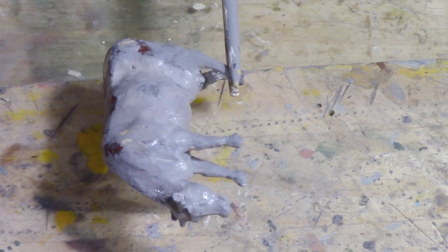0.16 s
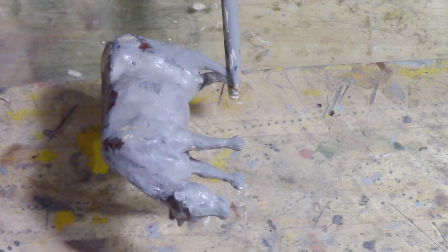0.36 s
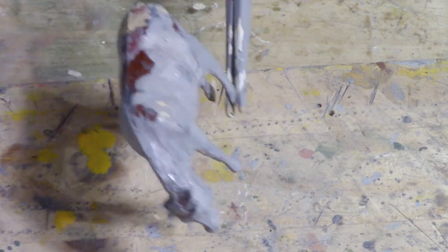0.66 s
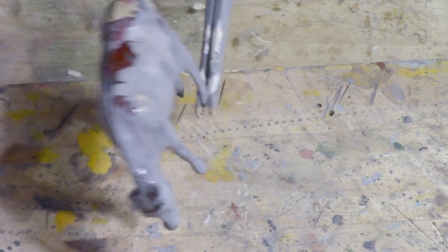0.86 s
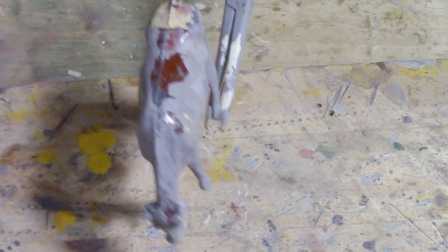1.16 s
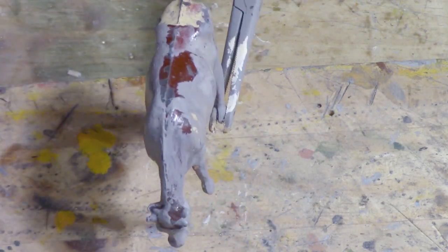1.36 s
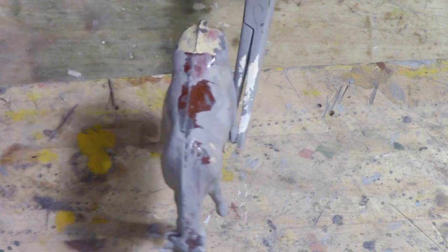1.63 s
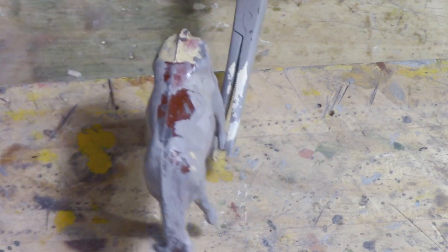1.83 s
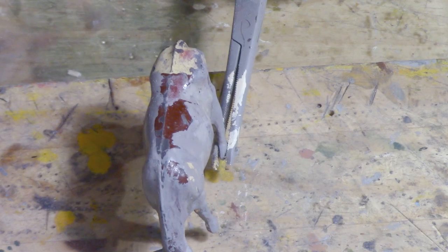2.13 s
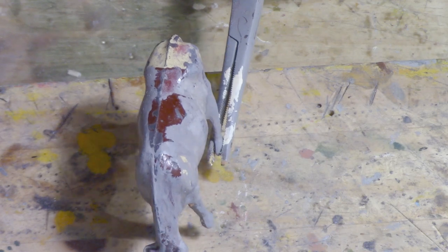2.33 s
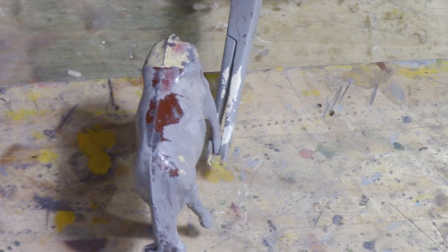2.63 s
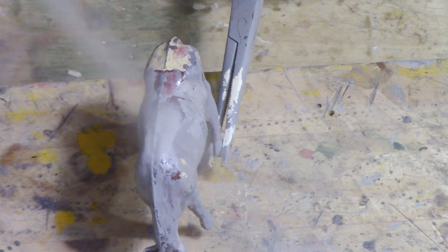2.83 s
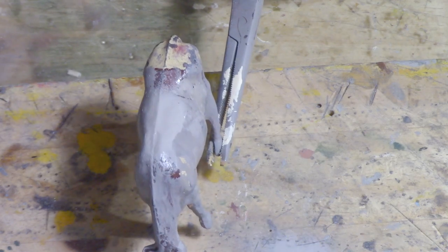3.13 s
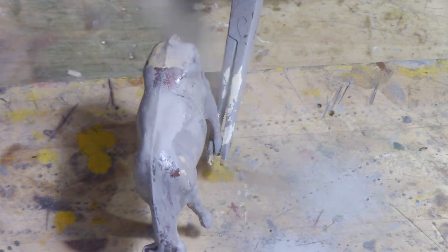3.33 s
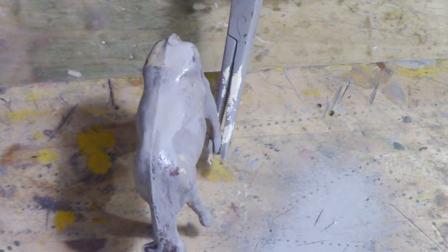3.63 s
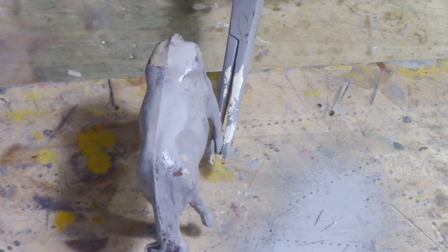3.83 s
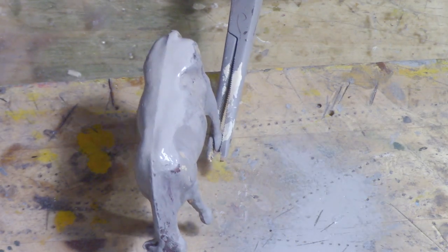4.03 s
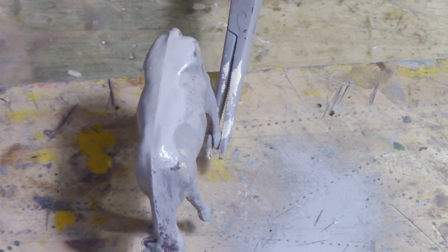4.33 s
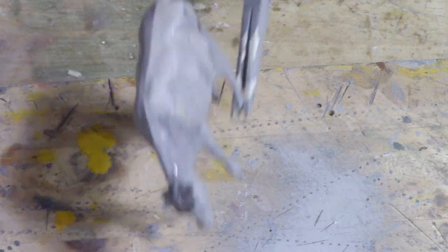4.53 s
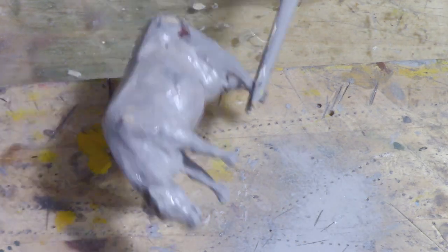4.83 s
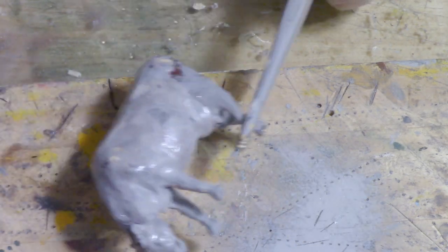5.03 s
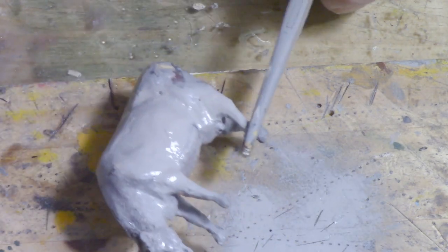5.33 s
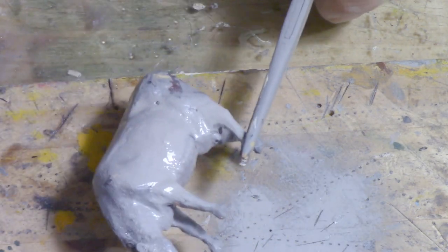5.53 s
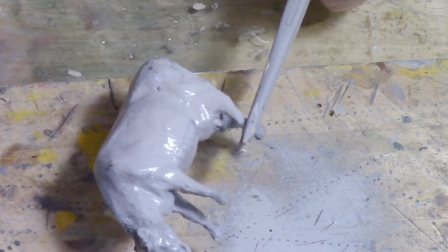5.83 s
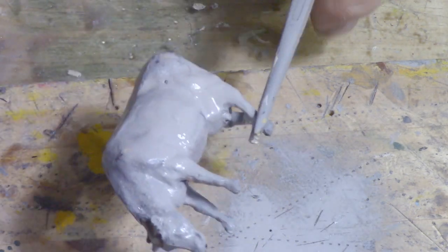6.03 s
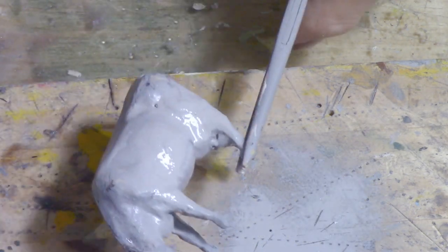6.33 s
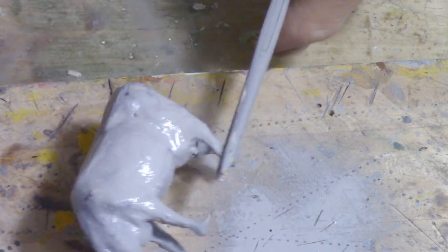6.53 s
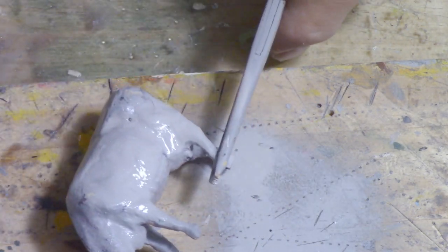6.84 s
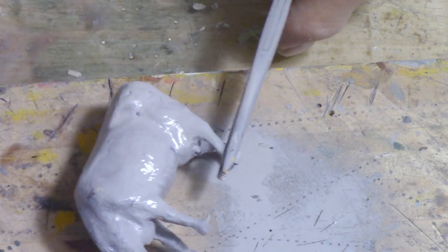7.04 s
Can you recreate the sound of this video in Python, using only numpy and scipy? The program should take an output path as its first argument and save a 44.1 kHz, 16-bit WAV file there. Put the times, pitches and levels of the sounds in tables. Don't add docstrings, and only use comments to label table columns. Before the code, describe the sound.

Hard, bright, dense clacking of mixing balls inside a thin metal can, in quick strokes, thins out into weaker ticks and a tiny low gurgle. After a brief quiet, short gas hisses with a wet, rough edge puff seven times, three and then four after a longer gap, with small metallic knocks as the can tilts. Close microphone, short room tail, low steady hiss.

```python
import sys
import numpy as np
from scipy import signal
from scipy.fft import rfft, irfft
from scipy.io import wavfile
from scipy.ndimage import uniform_filter1d, minimum_filter1d

SR = 44100
rng = np.random.default_rng(int(sys.argv[2]) if len(sys.argv) > 2 else 0)


def output_pcm(signal):
    pcm = np.clip(np.atleast_2d(signal).T, -1, 1) * 32767
    wavfile.write(sys.argv[1], SR, np.round(pcm).astype(np.int16))


def ratio(d):
    e = np.asarray(d, float) / 20
    return 10 ** e


N = 316682

# (frequency [Hz], density [dB per Hz])
FLOOR = [(25, -25), (110, -12.5), (190, -7), (340, -3), (500, -4.5), (900, -7.5), (1230, -8), (1500, -9),
         (2700, -15.5), (6000, -22), (11000, -30), (15700, -44)]
# (time [s], level [dB])
RUSTLE = [(4.45, -92), (4.62, -73.5), (4.7, -77.5), (4.72, -69), (4.751, -74.5), (4.775, -63.5),
          (4.82, -84.5)]
# (frequency [Hz], t60 [s])
ROOM_DECAY = [(250, 0.11), (700, 0.73), (1800, 0.41), (4600, 0.39), (9000, 0.29), (15000, 0.21)]
# (delay [ms], level [dB])
EARLY = [(1.0, -24), (2.3, -18), (9.5, -14), (13.0, -16.5)]
# (time [s], pitch [Hz], level [dB])
GURGLE = [(2.054, 345, -66), (2.068, 325, -48), (2.088, 279.3, -66), (2.108, 265, -51), (2.135, 255, -59),
          (2.15, 320, -59), (2.165, 325, -58), (2.2, 268, -58), (2.245, 245.6, -63)]

# (start [s], leak length [s], leak level [dB], open length [s], open level [dB])
PUFFS = [(2.782, 0.0533, -41, 0.095, -28), (3.302, 0.031, -42.5, 0.15, -29),
         (3.885, 0.028, -37, 0.12, -27.5), (5.154, 0.041, -44, 0.14, -30.5),
         (5.677, 0.0573, -43, 0.0588, -30.5), (6.489, 0.054, -45, 0.149, -31),
         (6.927, 0.048, -41, 0.081, -31.5)]
# (first delay [ms], level [dB], second delay [ms], level [dB], slide of the delays over the
BOUNCES = [(.65, -12, .542, -13, -.05), (.266, -10, .212, -9, -.04), (.206, -12, .548, -13, .1),
           (.398, -12, .518, -14, -.06), (.272, -12, 1.106, -14, .02), (.32, -11, .668, -13, -.02),
           (.452, -12, .668, -10, .02)]
# (wall ring [share], treble [dB], nozzle [Hz], mid swell [dB], lean over puff [dB])
GRIP = [(2.2, -6.5, 8700, 4, -1.5), (1.9, -4.5, 10000, 1.5, -2.5), (1.4, -6, 7300, 1.5, -2),
        (0.65, -5, 7500, 2.5, -0.5), (0.46, -4.5, 7500, 2, 2), (0.87, -4.5, 9200, 4, 1.5),
        (0.39, -9, 10300, 5, -1.5)]
# (frequency [Hz], density [dB per Hz])
JET = [(880, -66), (1500, -1.5), (1900, -15.5), (2640, -9), (2940, -7.5), (4420, 3.5), (4920, 3), (8570, 5),
       (14800, -1.5), (16000, -11)]
# (frequency [Hz], density [dB per Hz])
PAINT = [(59, -53), (100, -11), (414, 2), (513, -1.5), (618, -2.5), (1130, 0.5), (1610, 5), (2190, 2),
         (2370, 3.5), (3270, -4), (4000, -1.5), (5200, -67), (8800, -120)]
PAINT_DB = [
    -1.5,
    -18.5,
    -7.5,
    -5,
    -9,
    -3.5,
    4,
    0,
]

# (frequency [Hz], density [dB per Hz])
STEEL = [(1650, -48.5), (2800, -3), (3480, -0.5), (3800, -1), (4870, -2.5), (5720, 0), (8670, -9),
         (9890, -14), (15000, -32.5), (16000, -38)]
# (frequency [Hz], level [dB], t60 [s])
SHELL = [(3217, -3, 0.0077), (5640, 1, 0.021), (8760, -0.5, 0.0063), (10200, -10, 0.0071)]
# (frequency [Hz], density [dB per Hz])
CONTACT = [(6000, -30), (9000, -4.5), (10600, -1), (12500, -9), (16000, -30)]
# (frequency [Hz], t60 [s])
BRIGHT_DECAY = [(1250, .025), (1600, .008), (2700, .008), (3150, .007), (3480, .018), (3800, .006),
                (5700, .006), (9000, .005)]
# (low edge, high edge [Hz])
SNAP_HZ = [1100, 6500]
# (frequency [Hz], level [dB], t60 [s])
WALL = [(2318, -1, .04), (2375, -6, .022), (2420, 2, .042), (2455, -2, .03), (2532, -2, .034),
        (2206, -8, .025), (2260, -9, .018), (2590, -8, .02), (2633, -7, .028), (2090, -13, .018),
        (2790, -11, .018)]
# (frequency [Hz], level [dB], t60 [s])
BARREL = [(542.5, -12.5, 0.059), (1256, -7, 0.027), (1415, -7, .04), (1558, -5, .03), (1703, 3, 0.044),
          (2070, -4, 0.034), (2840, -1, .03), (3111, -6.5, 0.027), (3240, -2.5, .03), (3220, -1, 0.043),
          (3640, -2, 0.034), (3500, -4, 0.035)]
# (frequency [Hz], density [dB per Hz])
DOME = [(150, -35), (300, -18), (430, -15), (505, -14), (600, -10), (741, -6.5), (1230, 6.5), (1950, 2.5),
        (2730, -31.5), (4620, -120)]
# (time [s], pitch [share])
TILT = [(1.4, 1.0), (1.55, 0.95), (1.96, 0.93), (2.1, 0.92), (4.2, 0.99), (4.3, 0.97), (5.5, 0.97),
        (5.9, 0.93), (6.9, 0.86)]

# (start [s], length [s], loudest at [share 0-1], level [dB], dome over chatter [dB])
STROKES = [(0.031, 0.094, 0.13, -26.5, 6), (0.142, 0.22, 0.49, -18.5, -2), (0.363, 0.19, 0.7, -19, -3),
           (0.554, 0.18, 0.35, -17.5, -1.5), (0.727, 0.14, 0.86, -20.5, -4.5),
           (0.881, 0.16, 0.22, -31, 7.5), (1.078, .325, 0.45, -53, 13), (1.498, 0.66, 0.35, -57.5, 1),
           (0.0, 0.051, 0.3, -39, 0.5)]
CHATTER_THUD_DB = [-7.5, 9]
# (time [s], crack [dB], relative wall ring [dB], bright ring [Hz], relative contact [dB])
SHAKING = [(0.026, -23, 1, 4103, -4), (0.0327, -0.5, -16, 5280, 9.5), (0.0381, -9, -7.5, 7600, 6),
           (0.046, -2, -3, 2860, 2), (0.0517, -7.5, -6, 3030, 13), (0.06, -14, -5.5, 3460, -5),
           (0.072, -11.5, -9, 7050, -2), (0.0741, -3.5, -13, 4490, 10), (0.1289, -15, -12.5, 1430, -6.5),
           (0.1436, 1.5, -18, 4760, 9), (0.1512, -6.5, 0.5, 2580, -6.5), (0.157, -5.5, -12.5, 3270, 2.5),
           (0.1709, -3.5, -13, 2970, 6), (0.197, -6, -8, 3360, -1), (0.2351, -2.5, -9.5, 7260, 2),
           (0.241, -1.5, -8, 2745, -0.5), (0.2479, -6, -0.5, 3400, -3.5), (0.205, -8.5, -8, 3287, 1),
           (0.297, -14.5, -8, 3360, -0.5), (0.3644, -0.5, -12.5, 4300, 1), (0.3702, 0.5, -20.5, 7400, 7),
           (0.374, 3, -19.5, 4450, -1), (0.403, -1.5, -16.5, 5530, 3.5), (0.42, 1.5, -11, 3000, 1),
           (0.4389, -1, -5.5, 5400, 4.5), (0.4514, -4.5, -7, 5600, -0.5), (0.4565, -4, -4, 5150, 7),
           (0.4703, -6.5, -3, 7900, -2.5), (0.487, -12, -6, 5260, 6.5)]
# (time [s], crack [dB], relative wall ring [dB], bright ring [Hz], relative contact [dB])
SHAKING_ON = [(0.5534, 3.5, -21, 5850, 8.5), (0.558, 0, -20, 3390, 0), (0.566, -6, -20.5, 3540, 2),
              (0.5754, -7.5, -18.5, 6800, 2.5), (0.5893, -3.5, -19, 3520, 2.5), (0.601, -7, -17.5, 3480, 0),
              (0.612, -7.5, -16, 3450, -0.5), (0.637, -1.5, -11.5, 5600, -0.5),
              (0.6444, -3.5, -8, 5850, 0.5), (0.6567, -7.5, -9.5, 5400, 4.5), (0.6648, -7, 0.5, 2850, 3),
              (0.6771, -2.5, -5, 3510, -2.5), (0.727, 6.5, -25, 5780, -1.5), (0.7463, -12, 12.5, 2550, -2),
              (0.7653, -12.5, -19, 7700, 4.5), (0.7679, -4.5, -25, 3000, -1), (0.7969, 4, -27, 5580, 7),
              (0.8051, -0.5, -11.5, 5400, 0), (0.812, -6.5, -11, 3520, -2), (0.826, -16, -16.5, 6950, -1.5),
              (0.8326, -7, -21, 3440, -2), (0.8365, -10.5, -11.5, 1240, -1), (0.848, -11, -14, 1220, 1.5),
              (0.8774, -3, 2.5, 2840, -5), (0.883, -1.5, -16.5, 5070, -9), (0.9136, -1.5, -6, 5470, -11)]
# (time [s], crack [dB], relative wall ring [dB], bright ring [Hz])
SLOWING = [(0.9704, -10, -5, 3100), (1.0105, -14, -7, 3700), (1.038, -20.5, -10, 3770),
           (1.071, -9, -19, 6870), (1.0903, -9, -6.5, 5750), (1.118, -32, -3, 5100),
           (1.134, -8.5, -2, 2900), (1.153, -18, -12, 4300), (1.16, -19, -24, 2980),
           (1.163, -20, -17, 8400), (1.1766, -10.5, -15, 5600), (1.1827, -19, -5.5, 3630),
           (1.2274, -26.5, -3, 4300), (1.242, -22.5, -10, 5970), (1.257, -25, -3, 3630),
           (1.27, -18, -10, 6300), (1.2765, -19, -5.5, 6300), (1.285, -23.5, -4.5, 2970),
           (1.2937, -31, -11, 6200), (1.3015, -20.5, -12, 6050), (1.312, -26, -9, 4070),
           (1.332, -26, -1, 3440), (1.3372, -20.5, -14, 6200), (1.353, -28, -20, 3040)]
# (time [s], crack [dB], relative wall ring [dB], bright ring [Hz])
ROLLING = [(1.5457, -48, 0, 3300), (1.5682, -43.5, 2, 3330), (1.5716, -36, -9, 3100),
           (1.5805, -35, -3.5, 3370), (1.637, -45, -11, 3040), (1.6604, -30, -31, 5800),
           (1.6676, -34.5, -9, 3700), (1.696, -43, -3, 3900), (1.724, -34.5, -3.5, 2850),
           (1.7475, -42, 0, 3000), (1.7576, -29.5, -15, 6030), (1.7618, -36, -8, 3260),
           (1.7881, -31, -15, 3220), (1.9708, -22, -5, 3820), (1.982, -41, 11.5, 3050),
           (1.9957, -41, 4, 3020), (2.0103, -42, 4, 2820), (2.0276, -35.5, -12, 4040),
           (2.0761, -42, 1, 5500), (2.088, -48, 0, 2920), (2.445, -53.5, -2.5, 3300)]
# (time [s], crack [dB], relative wall ring [dB], bright ring [Hz], its level [dB])
STRAYS = [(3.8132, -49, -12.5, 3900, 2.5), (3.8348, -48, -16.5, 4310, 0), (3.895, -40, -17.5, 5700, 16),
          (4.2203, -25.5, -6, 3600, -4.5), (4.26, -36, -9, 3640, 3), (4.2635, -30, -17, 4190, -14),
          (4.3155, -37.5, -5.5, 3760, 0), (4.3226, -46, -12, 3850, 6.0), (4.49, -51.5, -7, 1900, 0),
          (5.1636, -32, -24, 7140, 8), (5.2097, -24, -21, 7750, 4), (5.5357, -29, -10, 3935, -2.5),
          (5.598, -36, -26, 3750, -3.5), (5.742, -21.5, -30, 7000, 2), (5.901, -31, -10, 3830, -7),
          (5.9136, -42, -8, 2940, 7), (5.9442, -41.5, -22, 4030, 14), (5.9947, -51, -9, 4040, 2),
          (6.18, -53, -3.5, 1903, -0.5), (6.5, -42, -14, 4000, 6), (6.516, -42, -9, 2700, 3),
          (6.878, -46, -11, 2900, 3), (6.9016, -21, -20, 4070, 4.5), (6.9067, -35.5, -14, 4440, 12),
          (6.9281, -30.5, -8, 9000, -3), (6.9474, -34, -30, 6350, 7), (6.9535, -29, -24, 6700, 7),
          (6.968, -30, -26, 9000, 11)]
STEEL_DB = [
    0.5,
    -0.5,
    -0.5,
    -2.5,
    -2,
]
THUD_DB = [
    -2.5,
    -3.5,
    -1,
    0.5,
    -5,
]
# (time [s], level [dB])
LURCH = [(0.05, -60), (0.15, -50.5), (0.244, -55.5), (0.367, -36), (0.453, -42.5), (0.556, -46),
         (0.73, -36.5), (0.806, -50), (0.88, -53.5)]


def evened(x):
    return x / np.sqrt(np.mean(x ** 2) + 1e-20)


def read(points, hz):
    f, value = np.transpose(points)
    return np.interp(np.log(hz + 1), np.log(f + 1), value)


def add(mix, s, sound):
    part = mix[round(s * SR):][:len(sound)]
    part += sound[:len(part)]


def noise(spectrum, count):
    hz = np.fft.rfftfreq(count, 1 / SR)
    bins = rfft(rng.standard_normal(count))
    return evened(irfft(bins * ratio(read(spectrum, hz)), count))


def drift(count, span):
    return evened(uniform_filter1d(uniform_filter1d(rng.standard_normal(count), span), span))


def floor():
    s, db = np.transpose(RUSTLE)
    cloth_db = np.interp(np.arange(N) / SR, s, db, -120, -120) + 3.0 * drift(N, 60)
    cloth = ratio(cloth_db) * noise(JET[:-2] + [(13000, -14.5), (16000, -35.0)], N)
    hiss = ratio(-57.5 + 0.5 * drift(N, 1500)) * noise(FLOOR, N)
    return hiss + cloth


def room(x):
    tails, turn_s = 3, 0.05
    out = np.zeros(N)
    turn = np.pi * np.arange(N) / SR / turn_s / tails
    for k in range(tails):
        hz, t, z = signal.stft(rng.standard_normal(SR), SR, nperseg=256)
        decay = ratio(-60 * t / read(ROOM_DECAY, hz)[:, None])
        tail = signal.istft(z * decay, SR, nperseg=256)[1]
        tail *= np.clip((np.arange(len(tail)) / SR - 0.004) / 0.004, 0, 1)
        feed = np.sqrt(2 / tails) * np.sin(turn + np.pi * k / tails)
        out += signal.fftconvolve(x * feed, tail / np.linalg.norm(tail))[:N]
    return out


def early(x):
    taps = np.zeros(1024)
    taps[0] = 1
    for ms, db in EARLY:
        taps[round(ms * SR / 1000)] = ratio(db)
    return signal.oaconvolve(x, taps / np.linalg.norm(taps))[:N]


def gurgle():
    s, hz, db = np.transpose(GURGLE)
    t = np.arange(s[0], s[-1], 1 / SR)
    throb = 1 + 0.3 * np.sin(2 * np.pi * 26 * (t - s[0]))
    tone = np.sin(2 * np.pi * np.cumsum(np.interp(t, s, hz)) / SR) * throb
    return s[0], np.sqrt(2) * ratio(np.interp(t, s, db)) * tone * signal.windows.tukey(len(t), 0.15)


def resonate(x, hz, width):
    turn = np.exp(2j * np.pi * np.cumsum(hz * np.ones(len(x))) / SR)
    r = np.exp(-np.pi * width / SR)
    return 2 * (turn * signal.lfilter([1 - r], [1, -r], x / turn + 1e-18)).real


def valve(start, leak_s, leak_db, open_s, open_db, swell_db, lean_db):
    spit_s, opening_s, closing_s, dribble_s = 0.019, 0.022, 0.013, 0.015
    half_s = (open_s - opening_s) / 2
    s = start + np.cumsum([0, spit_s, leak_s - spit_s, opening_s, half_s, half_s, closing_s, dribble_s])
    ends_db = open_db - swell_db / 2
    levels_db = [-54, leak_db + 1, leak_db,
                 ends_db - lean_db / 2, open_db + swell_db / 2, ends_db + lean_db / 2,
                 open_db - 23.5, open_db - 49]
    return s, levels_db


def bounce(sound, paths, treble_db):
    near_ms, near_db, far_ms, far_db, sweep = paths
    hz, t, z = signal.stft(sound, SR, nperseg=512)
    delay_ms = np.r_[near_ms, far_ms, rng.uniform(0.9, 2.6, 4)]
    slide = 1 + sweep * (2 * t / t[-1] - 1)
    turns = delay_ms[:, None, None] * hz[:, None] * slide / 1000
    echo = np.tensordot(ratio([near_db, far_db] + 4 * [-17]), np.exp(-2j * np.pi * turns), 1)
    comb = 1 + echo * np.clip(hz / 7000, 0, 1)[:, None]
    patches = evened(uniform_filter1d(uniform_filter1d(rng.standard_normal(z.shape), 6, 0), 5, 1))
    aim_db = treble_db * np.clip((hz - 9500) / 4000, 0, 1)[:, None] + 2.0 * patches
    return signal.istft(z * comb * ratio(aim_db), SR, nperseg=512)[1]


def puff(press, paths, grip):
    ring_share, treble_db, nozzle_hz, swell_db, lean_db = grip
    s, levels_db = valve(*press, swell_db, lean_db)
    t = np.arange(s[0], s[-1], 1 / SR)
    jet_db = np.interp(t, s, levels_db)
    paint_db = np.interp(t, s, PAINT_DB)
    rising_hz = nozzle_hz * (1 + 0.1 * ((t - s[0]) / (s[-1] - s[0]) - 0.5))
    jet = noise(JET, len(t))
    jet = evened(jet + 0.07 * resonate(jet, rising_hz, 900))
    roar = noise(PAINT, len(t))
    roar = evened(roar + ring_share * resonate(roar, 2310, 80) + 0.12 * resonate(roar, 1555, 90))
    sputter = ratio(1.06 * drift(len(t), 25) + 0.17 * drift(len(t), 250))
    sound = sputter * ratio(jet_db - 2.5) * (jet + ratio(np.minimum(paint_db, 6)) * roar)
    return s[0], bounce(sound * signal.windows.tukey(len(t), 0.04), paths, treble_db)


def ring(modes, spread_db=5, detune=0.01, tune=1):
    t = np.arange(2048)[:, None] / SR
    hz, db, t60 = np.transpose(modes)
    share, off, phase = rng.standard_normal((3, len(hz)))
    level = ratio(db + spread_db * share - 60 * t / t60)
    wave = (level * np.sin(2 * np.pi * hz * (tune + detune * off) * t + phase)).sum(1)
    fade_in = np.minimum(t[:, 0] / 0.0002, 1)
    fade_out = np.minimum(t[::-1, 0] / 0.01, 1)
    return wave / abs(wave).max() * fade_in * fade_out


def thud():
    t = np.arange(2048) / SR
    return noise(DOME, 2048) * ratio(-60 * t / 0.028) * np.minimum(t / 0.00046, 1)


def crack(steel_db, tick_db, bright_hz, bright_db):
    t = np.arange(2048) / SR
    steel = noise(STEEL, 2048) * ratio(-60 * t / 0.013) + 0.21 * ring(SHELL, detune=0.25)
    bright_level = 1.28 * ratio(bright_db - 60 * t / read(BRIGHT_DECAY, bright_hz))
    bright = bright_level * np.sin(2 * np.pi * bright_hz * t)
    tick = ratio(tick_db - 60 * t / 0.0078) * noise(CONTACT, 2048)
    snap_band = signal.butter(2, SNAP_HZ, "band", fs=SR, output="sos")
    snap = signal.sosfilt(snap_band, t == t[4])
    steel = steel + ratio(-10.0) * snap / abs(snap).max()
    onset = (1 - np.exp(-t / 0.00008)) ** 2
    return onset * (ratio(steel_db) * steel + bright + tick)


def rattle():
    out = np.zeros(N)
    gather_db, scatter_db = -4.5, -16
    for start, length, top, db, dome_db in STROKES:
        t = np.arange(0, length, 1 / SR) / length
        top = np.clip(top, 0.01, 0.99)
        level_db = db + np.interp(t, [0, top, 1], [gather_db * np.sqrt(top), 0, scatter_db])
        thud_db = np.interp(t, [0, 1], CHATTER_THUD_DB) + dome_db
        hit = rng.random(len(t)) < 1200 / SR
        size = ratio(4.2 * np.minimum(rng.exponential(1, len(t)), 3)) * hit
        spot = rng.integers(0, 16, len(t))
        tune = np.interp(start + length / 2, *np.transpose(TILT))
        parts = np.zeros((4, len(t)))
        for k in range(16):
            shapes = [crack(0, -17.5, rng.uniform(2100, 7100), -0.91),
                      ring(WALL, 3.0, 0.0028, tune),
                      ring(BARREL, 7, detune=0.0071),
                      thud()]
            hits = (size * (spot == k))[None]
            parts += signal.oaconvolve(hits, np.array(shapes), axes=1)[:, :len(t)]
        steel, wall, side, dome = (evened(p) for p in parts)
        chatter = steel + ratio(-3) * wall + ratio(-4) * side + ratio(thud_db - 0.5) * dome
        add(out, start, signal.windows.tukey(len(t), 0.015) * ratio(level_db - 1.5) * chatter)
    return out


def strikes():
    out = np.zeros(N)
    tables = (SHAKING, SHAKING_ON, SLOWING, ROLLING, STRAYS)
    for table, steel_db, thud_db in zip(tables, STEEL_DB, THUD_DB):
        for s, db, ring_db, hz, *more in table:
            more_db = sum(more)
            contact_db, bright_db = (0, more_db) if table is STRAYS else (more_db, 0)
            tune = np.interp(s, *np.transpose(TILT))
            tick_db = -16.0 + 0.2 * max(db, -30) + contact_db
            wall_db = ring_db + 3
            blunt_db = 0.51 * wall_db
            body = (ratio(wall_db + 6.0) * ring(WALL, 3.5, 0.004, tune)
                    + ratio(blunt_db + thud_db - 3.5) * thud()
                    + ratio(blunt_db - 16.5) * ring(BARREL, detune=0.008))
            knock = crack(steel_db, tick_db, hz, bright_db) + body
            add(out, s + 0.0006, ratio(db - 4) * knock)
    return out


def lurch():
    out = np.zeros(N)
    u = np.arange(1024) / SR / 0.0007
    for s, db in LURCH:
        add(out, s, ratio(db + 9.0) * u ** 2 * np.exp(-u))
    return out


def scene():
    can_cut = signal.butter(2, 222, "high", fs=SR, output="sos")
    can = signal.sosfilt(can_cut, strikes() + rattle())
    spray = np.zeros(N)
    for row in zip(PUFFS, BOUNCES, GRIP):
        add(spray, *puff(*row))
    add(spray, *gurgle())
    dull_can = signal.lfilter(*signal.butter(2, 10500, fs=SR), can)
    near = early(can) + spray + room(ratio(-7.5) * dull_can + ratio(-8.0) * spray)
    bass_cut = signal.butter(3, 150, "high", fs=SR, output="sos")
    return (signal.sosfilt(bass_cut, near) + floor())[None]


def band_limit(x):
    return signal.sosfilt(signal.butter(12, 16420, fs=SR, output="sos"), x)


def record(dry):
    edge = signal.firwin(1501, 15780, window=("kaiser", 9), fs=SR)
    headroom = np.minimum(0.97 / (abs(dry) + 1e-9), 1)
    squeeze = uniform_filter1d(minimum_filter1d(headroom, size=13), size=11)
    limited = signal.oaconvolve(dry * squeeze + lurch(), edge[None], "same")
    return band_limit(limited)


dry = scene()
out = record(dry)
output_pcm(out)
```